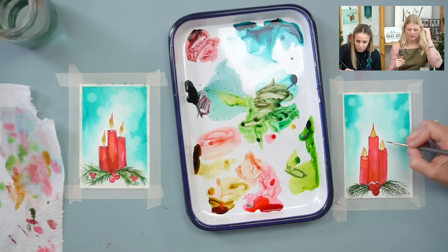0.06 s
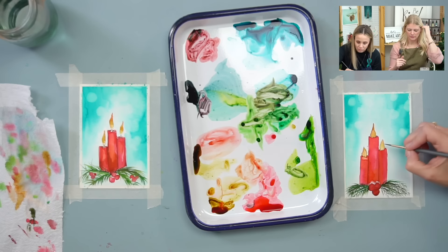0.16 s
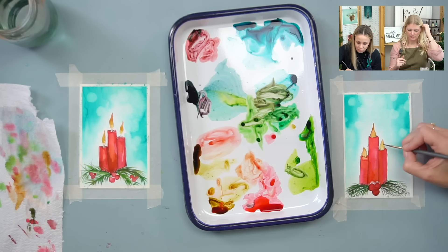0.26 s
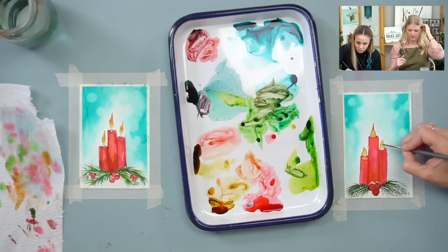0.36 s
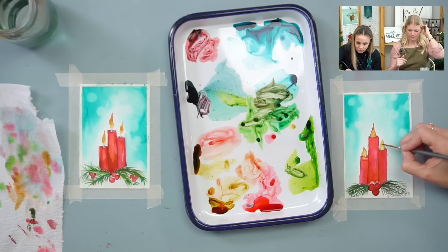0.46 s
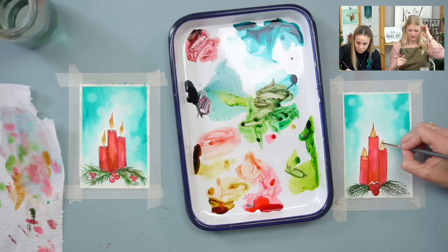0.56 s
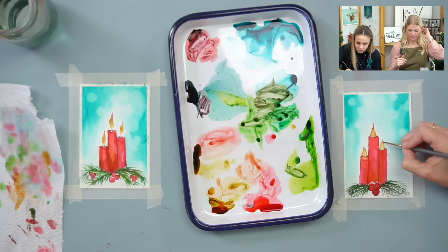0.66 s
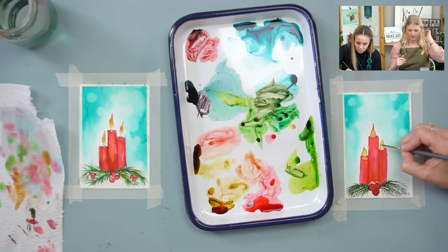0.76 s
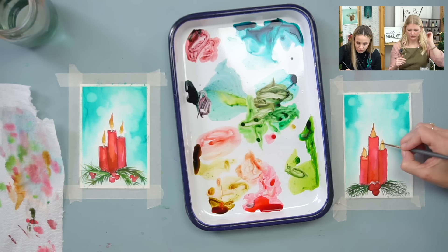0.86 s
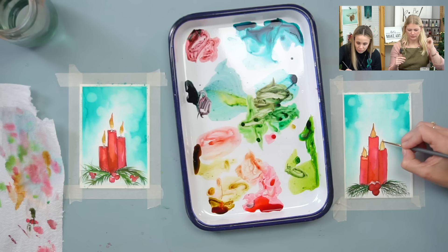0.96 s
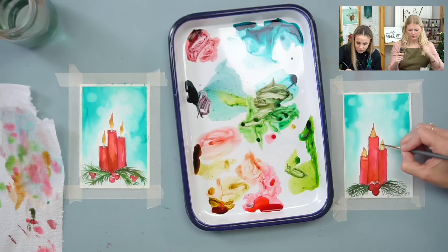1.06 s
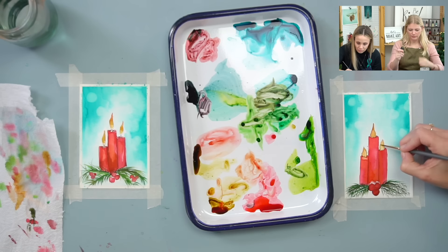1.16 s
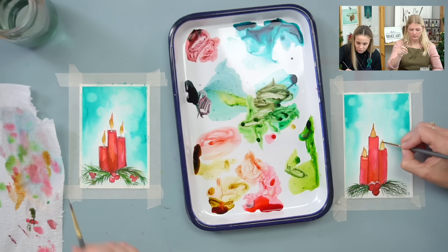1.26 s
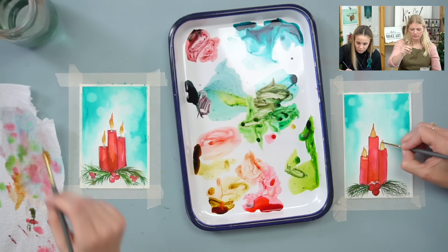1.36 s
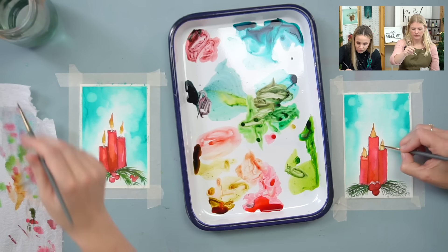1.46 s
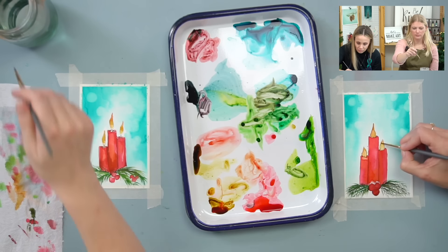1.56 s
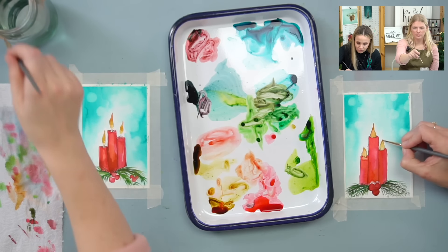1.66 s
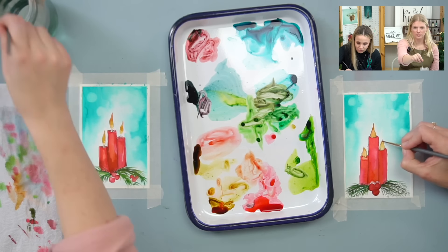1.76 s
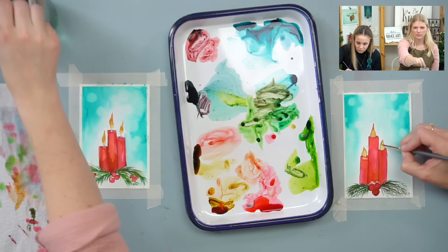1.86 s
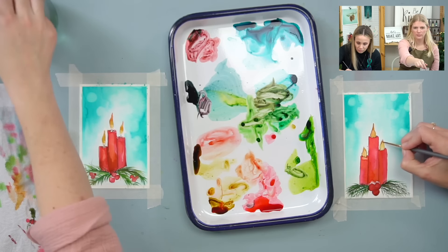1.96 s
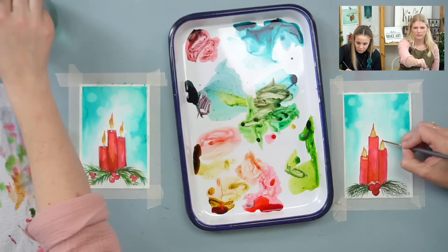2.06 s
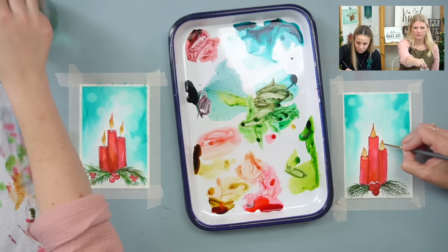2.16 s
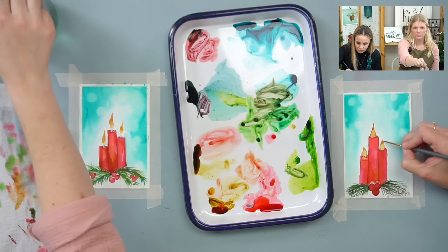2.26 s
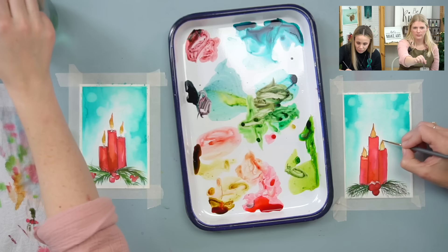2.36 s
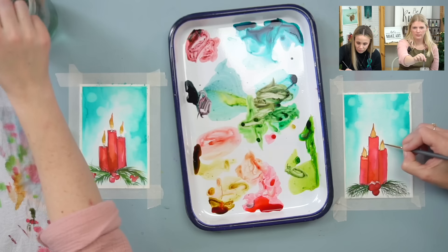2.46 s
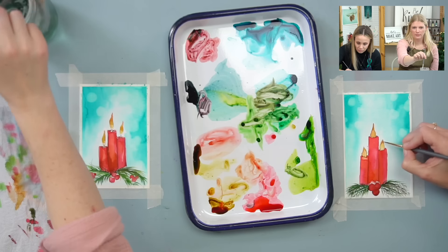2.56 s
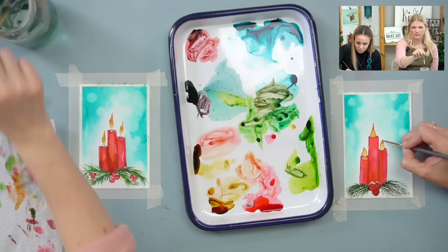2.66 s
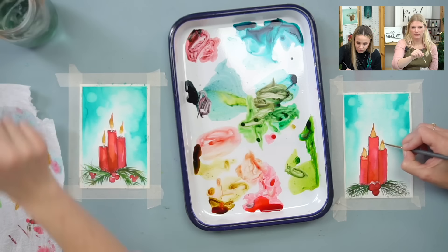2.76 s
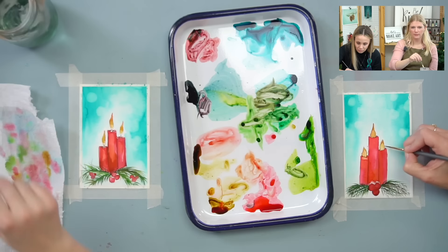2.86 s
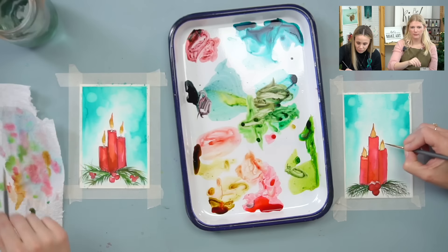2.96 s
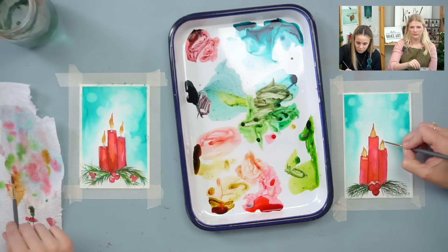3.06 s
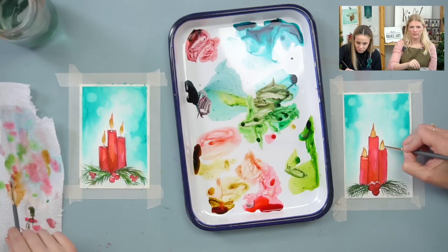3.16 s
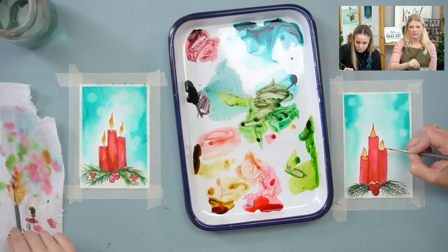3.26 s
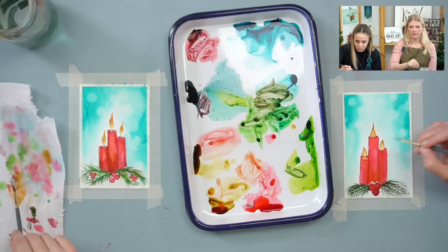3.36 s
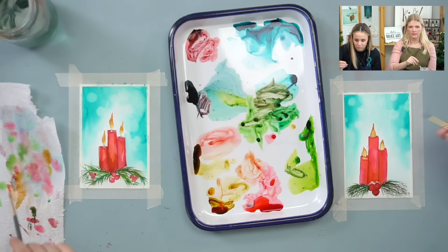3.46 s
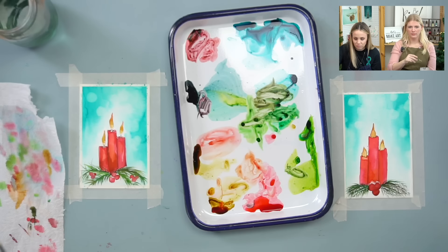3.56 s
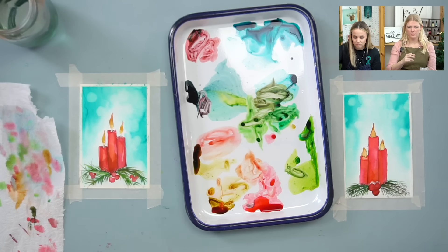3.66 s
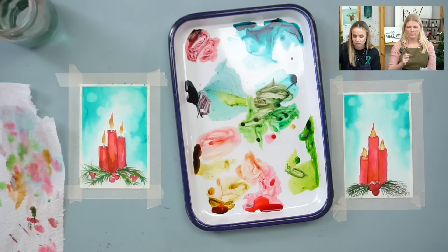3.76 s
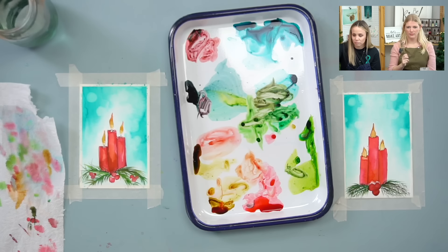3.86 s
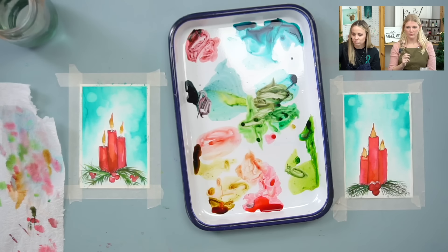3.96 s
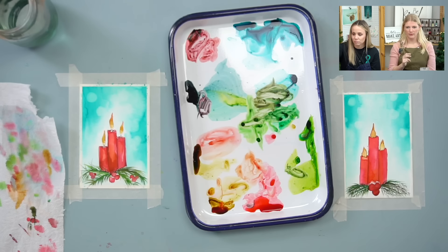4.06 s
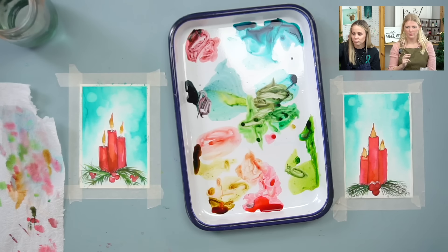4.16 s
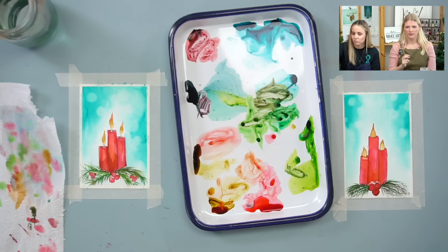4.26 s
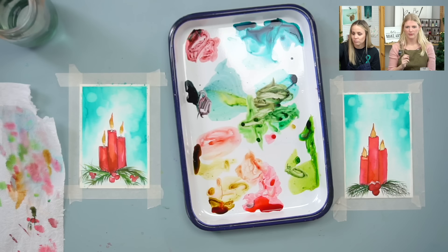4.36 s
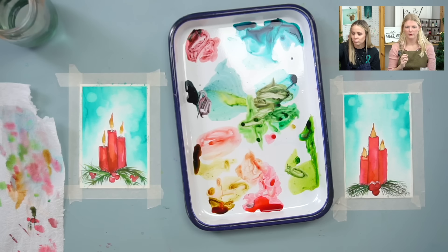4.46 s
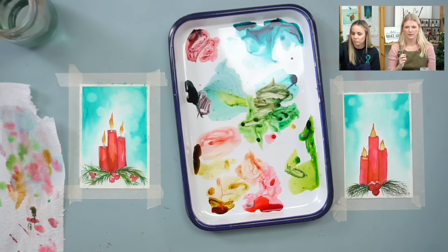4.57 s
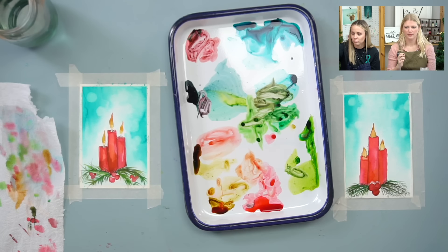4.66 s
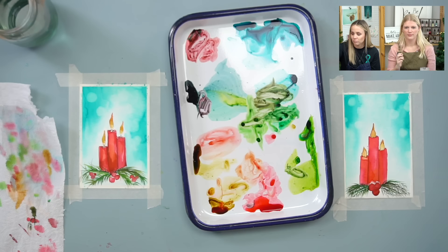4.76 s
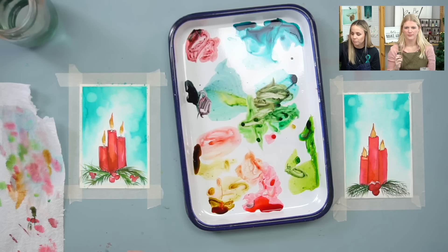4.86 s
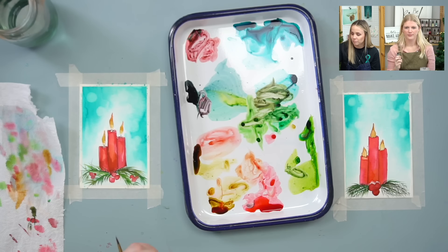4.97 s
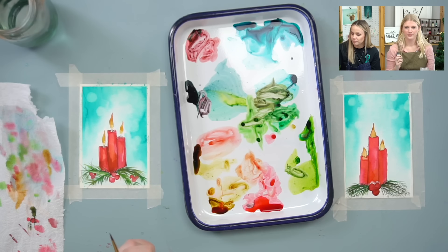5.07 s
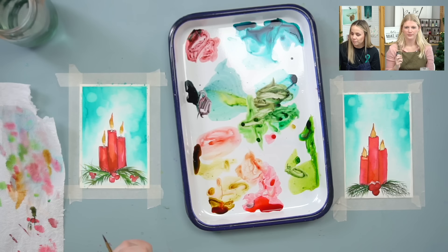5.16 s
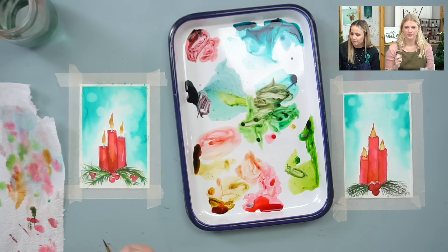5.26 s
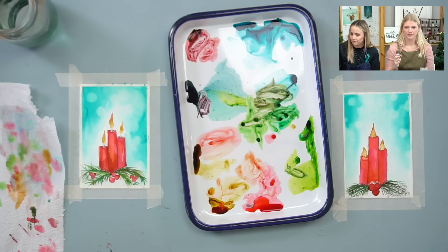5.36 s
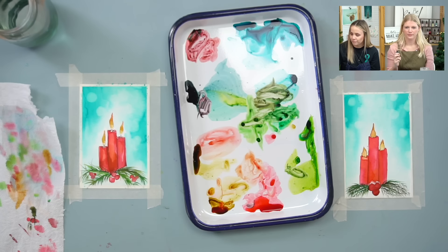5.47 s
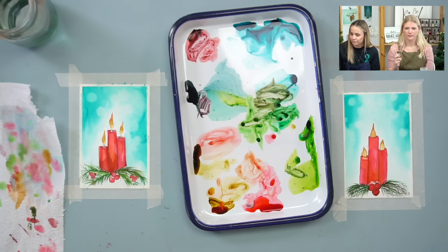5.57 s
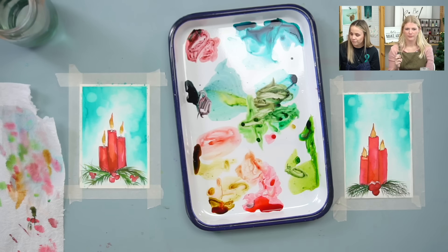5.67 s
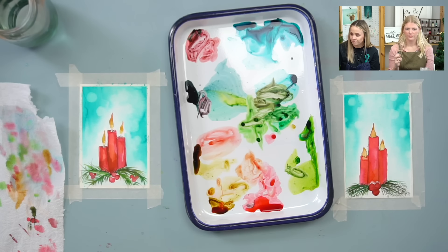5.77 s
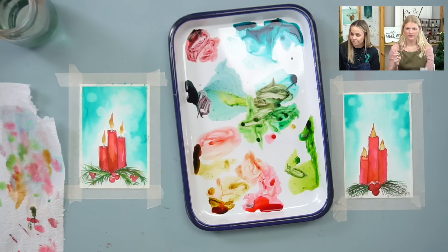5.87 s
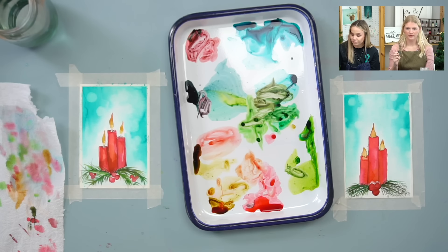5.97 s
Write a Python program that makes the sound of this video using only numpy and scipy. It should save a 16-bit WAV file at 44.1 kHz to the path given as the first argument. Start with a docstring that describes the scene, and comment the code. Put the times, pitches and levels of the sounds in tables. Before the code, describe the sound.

A quiet room is heard from one microphone above a craft table, with low ventilation rumble and electrical hum throughout. A soft, low echo dies away at the start. Wet bristles whisper very faintly on paper around 0.4 seconds and again at 1 second. Near 1.4 seconds a sleeve rustles, with a few light ticks and a soft bump. Then come the loudest sounds: a wooden paintbrush taps the rim of a glass water jar three times, at about 1.9, 2.1 and 2.5 seconds. Each bright clink rings briefly with a slightly different colour, and the second has a tiny rebound. Small ticks and a cloth swish follow around 2.7 seconds, then soft hand bumps between 2.9 and 3.8 seconds. From 4.5 to 4.9 seconds there are more light clicks and sleeve rustles. Faint cloth movement continues over the hum until about 6 seconds.

```python
"""A craft table in a quiet room, one microphone above it.
A paintbrush is tapped three times on the rim of a glass water jar. Each tap lands on another spot,
so the same glass modes ring in a new balance; close pairs beat. A low room echo dies away at the start.
A sleeve swells with each move of the arm, bristles whisper on paper, and hand and brush make small
ticks and bumps. Behind it all: ventilation rumble, mains hum and a low room resonance."""
import sys
import numpy as np
from scipy import signal
from scipy.fft import rfft, irfft, next_fast_len
from scipy.io import wavfile
from scipy.ndimage import map_coordinates

SR = 44100
rng = np.random.default_rng(int(sys.argv[2]) if len(sys.argv) > 2 else 0)


def waveform_to_disk(signal):
    """Save audio, clipped to [-1, 1], as 16-bit WAV at the path in sys.argv[1]."""
    frames = np.transpose(np.atleast_2d(signal))
    scaled = np.clip(frames, -1, 1) * 32767
    samples = np.round(scaled).astype(np.int16)
    wavfile.write(sys.argv[1], SR, samples)


N = 265570


def jar():
    """Each tap: a contact crack, ringing glass, a shimmer of weak modes and a knock in the handle."""
    # modes of the glass: f/Hz, t60/s, level/dB at each of three rim spots
    modes = [(2729, 0.46, -19, -43, -37), (2762, 0.36, -37, -37, -38), (2816, 0.45, -19.5, -47, -31),
             (3779, 0.25, -22, -46, -33), (3951, 0.25, -47, -32, -38), (4025, 0.2, -43, -24, -38),
             (4388, 0.26, -16, -44, -33), (4582, 0.21, -29, -49, -43), (4678, 0.2, -42, -35, -44),
             (5285, 0.3, -49, -38, -34), (5410, 0.33, -33, -49, -28), (5459, 0.23, -31, -50, -21),
             (5490, 0.33, -29, -37, -32), (7361, 0.19, -56, -30, -56), (7820, 0.2, -46, -42, -46),
             (8269, 0.17, -33, -54, -40), (8360, 0.16, -29, -41, -50), (8904, 0.16, -28, -44, -22),
             (9043, 0.19, -23, -37, -27), (9803, 0.17, -37, -47, -43), (10930, 0.18, -48, -52, -41),
             (11360, 0.17, -55, -53, -36), (12090, 0.17, -39, -63, -32), (12400, 0.17, -37, -59, -36),
             (12910, 0.2, -43, -62, -41), (13204, 0.17, -33, -55, -38), (14240, 0.17, -51, -59, -43),
             (14690, 0.17, -47, -67, -45)]
    # one tap a spot: t/s, ring/dB, crack/dB, shimmer/dB, shimmer tilt/(dB per octave), knock/dB
    taps = [(1.8737, 1.3, -28, -31, 0, -41), (2.1400, 0.5, -25, -36, 1, -31),
            (2.4873, -0.5, -18, -30, 4, -29.5)]
    # the handle rebounds on the rim: t/s, crack/dB, knock/dB
    rebounds = [(2.1477, -31, -46), (2.159, -42, -27)]
    out, t = np.zeros(N), np.arange(SR) / SR
    hz, t60, spot_db = np.hsplit(np.array(modes), [1, 2])
    swell = 1 - 0.28 * np.exp(-t / (t60 / 10))  # reflections off table and walls pile up on each note
    for spot, (s, ring_db, crack_db, shimmer_db, tilt_db, knock_db) in enumerate(taps):
        phase = rng.uniform(0, 2 * np.pi, hz.shape)
        # late reflections make each note flutter, the high ones most
        drift = signal.resample(rng.standard_normal((len(hz), 64)), len(t), axis=1)
        flutter = amp(3.7 * np.sqrt(hz / hz.mean()) * drift)
        notes = swell * flutter * fade(t, t60) * np.sin(2 * np.pi * hz * t + phase)
        ring = in_room(amp(ring_db + spot_db[:, spot]) @ notes, wet_db=-19)
        shimmer = amp(shimmer_db) * fade(t, 0.24) * dense_modes(len(t), tilt_db, count=140)
        add(out, s, ring + shimmer + strike(t, crack_db, knock_db))
    for s, crack_db, knock_db in rebounds:
        add(out, s, strike(t, crack_db, knock_db))
    return out


def dense_modes(size, tilt_db, count):
    """Many weak partials at random pitches, blurred with noise as by the room; rms 1."""
    # colour of the shimmer: f/Hz, relative level/dB
    colour = [(1500, -21), (2300, -1.5), (2900, 7.5), (4400, 7.5), (6600, -4), (9000, 2), (10300, -0.5),
              (12500, -1), (16000, -8)]
    lines = np.zeros(size // 2 + 1, complex)
    place, turn = rng.random((count, 2)).T
    lines[(place * len(lines)).astype(int)] = np.exp(2j * np.pi * turn)
    partials = unit(irfft(lines, size)) + rng.standard_normal(size)
    return coloured(partials, colour, tilt_db)


def strike(t, crack_db, knock_db):
    """Wood meets glass: a short crack and the handle's note, answered by the room."""
    # colour of the crack: f/Hz, relative level/dB
    colour = [(500, -24), (1800, -24), (2500, 4.5), (3600, 11.5), (6000, -2), (12000, -16), (16000, -13)]
    # modes of the wooden handle: f/Hz, t60/s, level/dB
    handle = [(810, 0.041, -4), (1093, 0.073, -15)]
    crack = amp(crack_db) * fade(t, 0.025) * noise(colour, len(t))
    knock = sum(amp(db) * fade(t, t60) * np.sin(2 * np.pi * hz * t) for hz, t60, db in handle)
    return in_room(crack + amp(knock_db) * knock, wet_db=-14)


def table_contacts():
    """Small contacts on the table: each is one damped resonance, set off by a brief scuff."""
    # light ticks of the brush and small things: t/s, level/dB, f/Hz, t60/s
    ticks = [(1.364, -38, 2500, 0.0021), (1.456, -31.5, 1800, 0.0025), (1.623, -29.5, 3450, 0.0014),
             (2.622, -32, 1280, 0.01), (2.635, -40, 8000, 0.0021), (2.664, -31, 1730, 0.0086),
             (2.703, -29, 5100, .003), (3.193, -35.5, 1600, 0.0028), (3.700, -33, 1275, .003),
             (4.468, -33, 1430, 0.029), (4.469, -39.5, 4444, 0.14), (4.492, -30.5, 4400, 0.078),
             (4.673, -38, 4680, 0.026), (4.848, -38, 5950, 0.021), (4.893, -35, 810, 0.013)]
    # soft bumps of the hand: t/s, level/dB, f/Hz, t60/s
    bumps = [(1.455, -35.5, 200, 0.2), (2.922, -37, 260, 0.058), (2.982, -40, 210, 0.029),
             (3.177, -22, 174, 0.0058), (3.697, -25, 397, 0.016), (3.746, -27, 111, 0.072)]
    out, t = np.zeros(N), np.arange(SR // 2) / SR
    for contacts, scuff_db, wet_db in [(ticks, -9.5, -7), (bumps, -5.5, -5)]:
        for s, db, hz, t60 in contacts:
            colour = [(hz / 10, -24), (hz, 0), (hz * 2, -17), (hz * 10, -50)]
            scuff = amp(scuff_db) * noise(colour, len(t)) * fade(t, 0.01)
            attack = 1 - np.exp(-20 * t / t60)
            tone = attack * fade(t, t60) * np.sin(2 * np.pi * hz * t)
            add(out, s, in_room(amp(db) * (tone + scuff), wet_db))
    return out


def sleeve_and_echo():
    """A low room echo dies away; then cloth slides: rushing, catching fibres over low flapping folds."""
    # first row the opening echo, the rest moves of the arm:
    # t/s at the peak, rise/s, fall/s, rustle/dB, low band/dB
    swells = [(0.01, 0.056, 0.092, -57, -41.5), (1.42, 0.34, 0.23, -53, -47.5),
              (2.08, 0.66, 0.34, -54.5, -48.5), (2.68, 0.078, 0.25, -45.5, -62),
              (2.92, 0.17, 0.19, -53.5, -43), (3.68, 0.3, 0.31, -53, -51), (4.52, 0.17, 0.22, -49.5, -57),
              (4.7, 0.1, 0.13, -52.5, -45.5), (4.92, 0.08, 0.088, -53.5, -51.5),
              (5.64, 0.19, 0.3, -61.5, -51), (5.97, 0.19, 0.14, -62, -49)]
    # colour of sliding cloth: f/Hz, relative level/dB
    cloth = [(250, -15.5), (550, 5.5), (1200, 3.5), (2000, -7), (4500, -18), (7000, -24.5), (11000, -33),
             (15500, -40)]
    rest_db, brisk_db = -73.5, -50.5  # rustle of the arm at rest and in a brisk move
    hiss_db, hiss_growth, hiss_hz = -55, 0.86, 3000  # level when brisk, dB per dB of rustle, crossover
    catches_per_s, catch_strength = 280, 0.45  # fibres that snag and let go
    rustle_power, low_power = amp(rest_db) ** 2, 0
    for s, rise, fall, rustle_db, low_db in swells:
        envelope = glide(s, rise, fall)
        rustle_power += (amp(rustle_db) * envelope) ** 2
        low_power += (amp(low_db) * envelope) ** 2
    rustle_gain = np.sqrt(rustle_power)
    hiss_gain = amp(hiss_db) * (rustle_gain / amp(brisk_db)) ** hiss_growth
    catches = unit((rng.random(N) < catches_per_s / SR) * rng.standard_normal(N))
    fibres = (rng.standard_normal(N) + catch_strength * catches) * amp(1.6 * wobble(45))
    highpass = lambda hz: 1 / (1 + (hiss_hz / (hz + 1)) ** 4)
    rustle = unit(filtered(fibres, lambda hz: amp(along(cloth, hz)) * (1 - highpass(hz))))
    hiss = unit(filtered(fibres, lambda hz: amp(along(cloth, hz)) * highpass(hz)))
    low_band = noise([(50, -26), (150, 2), (400, -5.5), (900, -16), (3000, -73)], N)
    return rustle_gain * rustle + hiss_gain * hiss + np.sqrt(low_power) * low_band


def bristles():
    """Wet bristles whisper over paper, louder the faster they slide."""
    # brush strokes: t/s at full speed, rise/s, fall/s, level/dB
    strokes = [(0.36, 0.26, 0.14, -63.5), (1.01, .015, 0.035, -64)]
    # colour of bristles on paper: f/Hz, relative level/dB
    paper = [(1000, -27), (2500, -2), (4500, 4.5), (9500, -3), (15500, -22)]
    gain = sum(amp(db) * glide(s, rise, fall) for s, rise, fall, db in strokes)
    return gain * noise(paper, N)


def room_tone():
    """Ventilation rumble with mains hum and a low room resonance, all slightly unsteady."""
    # colour of the rumble: f/Hz, relative level/dB
    air = [(25, -27), (36, -21), (55, -9.5), (90, 0.5), (140, -6.5), (175, -3.5), (230, -10), (310, -6),
           (400, -9), (600, -15.5), (900, -25.5), (1600, -34.5), (5000, -36.5), (10000, -42.5),
           (15800, -46)]
    # mains hum, then the room resonance: f/Hz, level/dB
    tones = [(120, -56.5), (174, -60)]
    rumble = amp(-47 + 1.8 * wobble(5.82)) * noise(air, N)
    hum, t = np.zeros(N), np.arange(N) / SR
    for hz, db in tones:
        rms = amp(db + 2.9 * wobble(4.63))
        hum += rms * np.sqrt(2) * np.sin(2 * np.pi * hz * t + 0.4 * wobble(6))
    return rumble + hum


def in_room(sound, wet_db):
    """The direct sound at the microphone plus a short diffuse tail from the walls."""
    # decay of the room: f/Hz, t60/s
    walls = [(200, 0.32), (3000, 0.36), (8000, 0.42), (15000, 0.39)]
    hz, t, spectra = signal.stft(rng.standard_normal(SR // 2), SR, nperseg=256)
    tail = signal.istft(spectra * fade(t, along(walls, hz)[:, None]), SR, nperseg=256)[1]
    tail *= 1 - np.exp(-np.arange(len(tail)) / SR / 0.0029)  # the reflections build up
    return sound + amp(wet_db) * signal.fftconvolve(sound, tail / np.linalg.norm(tail))[:len(sound)]


def glide(s, rise, fall):
    """One swell, 0-1: it builds up to its peak at s seconds and eases off."""
    shape = 1.2  # 1 = pointed swell, 2 = rounded bell
    t = np.arange(N) / SR - s
    return np.exp(-np.abs(t / np.where(t < 0, rise, fall)) ** shape)


def amp(db):
    """Decibels to gain."""
    return 10 ** (np.asarray(db) / 20)


def unit(x):
    """Scale to rms 1."""
    return x / np.sqrt(np.mean(x ** 2) + 1e-20)


def along(points, hz):
    """Read (f/Hz, value) points at hz, on a log frequency axis."""
    freqs, values = np.transpose(points)
    return np.interp(np.log(hz + 1), np.log(freqs), values)


def fade(t, t60):
    """Exponential decay, 60 dB down after t60 seconds."""
    return np.exp(-np.log(1000) * t / t60)


def filtered(x, response):
    """Filter x with a gain given as a function of frequency."""
    size = next_fast_len(len(x) + SR // 4)
    return irfft(rfft(x, size) * response(np.fft.rfftfreq(size, 1 / SR)), size)[:len(x)]


def coloured(x, colour, tilt_db=0):
    """Shape x by (f/Hz, level/dB) points, tilted by tilt_db an octave; rms 1."""
    return unit(filtered(x, lambda hz: amp(along(colour, hz) + tilt_db * np.log2(hz + 1))))


def noise(colour, size):
    """Noise shaped by (f/Hz, level/dB) points; rms 1."""
    return coloured(rng.standard_normal(size), colour)


def wobble(rate):
    """A smooth random curve, rate knots a second."""
    knots = rng.standard_normal(int(N * rate / SR) + 4)
    return map_coordinates(knots, [np.arange(N) * rate / SR])


def add(track, s, sound):
    """Mix a sound into the track at s seconds."""
    part = track[round(s * SR):][:len(sound)]
    part += sound[:len(part)]


def scene():
    """Everything at one microphone over the table."""
    return (table_contacts() + jar() + sleeve_and_echo() + bristles() + room_tone())[None]


def record(dry):
    """The recorder keeps nothing above its band limit."""
    top_hz = 15850
    return np.array([filtered(channel, lambda hz: hz < top_hz) for channel in dry])


dry = scene()
out = record(dry)
waveform_to_disk(out)
```